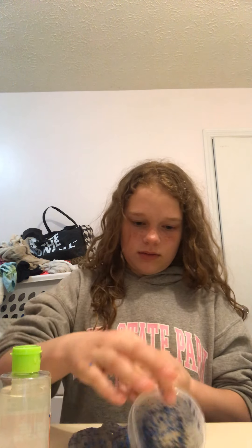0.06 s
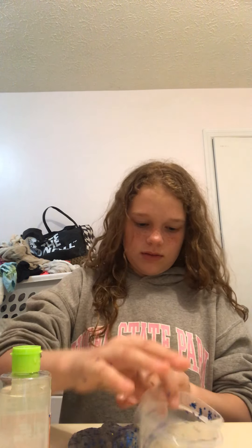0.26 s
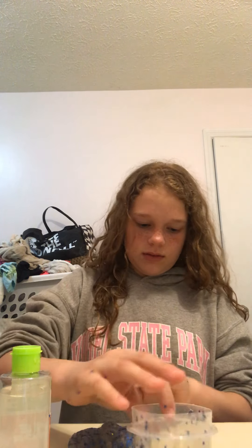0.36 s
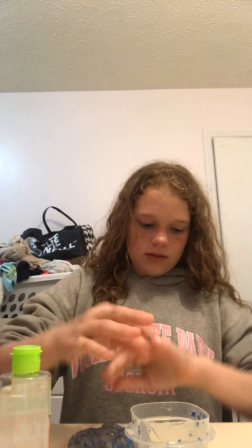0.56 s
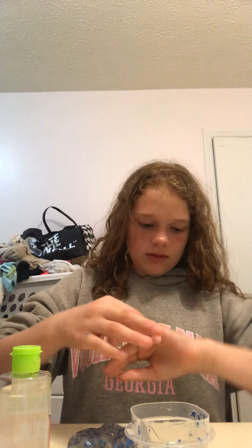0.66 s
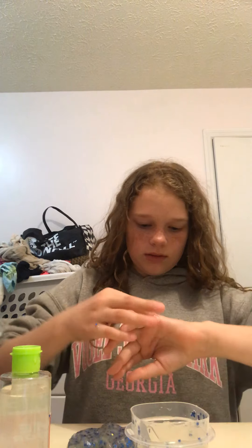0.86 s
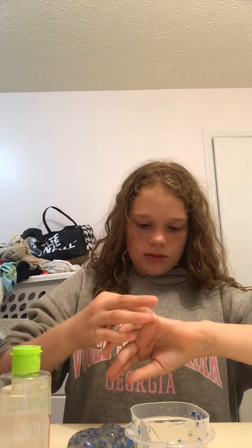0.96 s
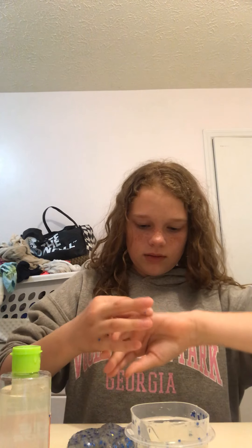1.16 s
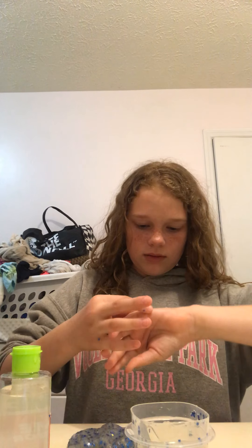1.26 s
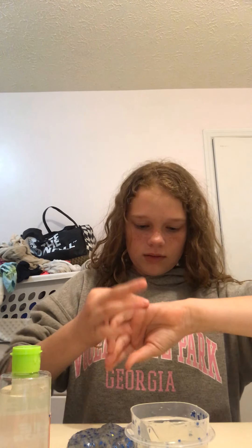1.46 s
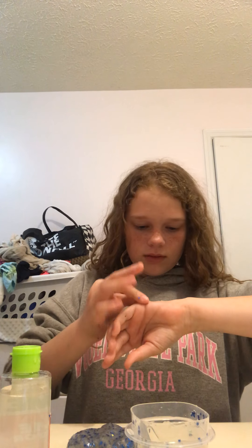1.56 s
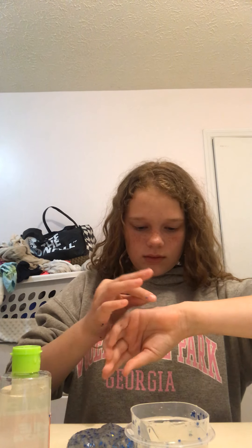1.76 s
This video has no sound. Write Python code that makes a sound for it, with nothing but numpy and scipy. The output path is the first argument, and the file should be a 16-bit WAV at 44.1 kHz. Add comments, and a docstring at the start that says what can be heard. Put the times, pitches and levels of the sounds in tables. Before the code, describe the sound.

An empty plastic tub tips over on a table, starting with a light tap and a soft rub. At about 0.2 seconds it lands with a sharp, hollow knock and skids briefly. A second knock follows near 0.4 seconds as it drops flat, and it rocks to rest by about 0.6 seconds. The small room rings shortly, then only a faint, low ventilation rumble remains.

```python
"""An empty plastic tub tips over onto a table in a small, quiet room.
It rubs as it turns, lands with a hollow knock, skids briefly, then drops flat with a second knock
and rocks to rest. Each contact rings its walls, base and rim and thuds the table; the rub and skid
are dense tiny catches of slipping plastic. The room rings shortly over a low ventilation rumble."""
import sys
import numpy as np
from scipy import signal
from scipy.fft import rfft, irfft
from scipy.io import wavfile
from scipy.ndimage import uniform_filter1d

SR = 44100
rng = np.random.default_rng(int(sys.argv[2]) if len(sys.argv) > 2 else 0)


def dump_mix(stems):
    """Bounce the given channels to the path in sys.argv[1] as a 16-bit WAV at rate SR."""
    frames = np.atleast_2d(stems).T  # one column per channel
    limited = np.clip(frames, -1, 1)  # hard clip at full scale
    pcm = np.round(limited * 32767).astype(np.int16)
    wavfile.write(sys.argv[1], SR, pcm)


N = 79380

# modes of the table under the tub: pitch_hz, level_db, t60_s
TABLE_MODES = [(59.66, -47.5, 0.38), (132.5, -29.5, 0.33), (167.2, -45.5, .5), (222, -44.5, .12),
               (362, -38, .1), (430, -37.5, .08)]
# modes of the tub's rim: pitch_hz, level_db, t60_s
RIM_MODES = [(2096, -29.5, 0.15), (2862, -46.5, 0.24)]


def from_db(db):
    """Decibels to gain."""
    return 10 ** (np.asarray(db) / 20)


def unit_rms(x):
    """Scale to unit rms."""
    return x / np.sqrt(np.mean(x ** 2) + 1e-20)


def at_hz(curve, hz):
    """Read a curve along log frequency."""
    freqs, values = np.transpose(curve)
    return np.interp(np.log(hz + 1e-9), np.log(freqs), values)


def passed(x, hz, kind):
    """Butterworth high-, low- or band-pass."""
    return signal.sosfilt(signal.butter(4, hz, kind, fs=SR, output="sos"), x)


def coloured(x, colour):
    """Minimum-phase EQ with the given curve and unit power gain."""
    gain = unit_rms(from_db(at_hz(colour, np.fft.rfftfreq(2 * N, 1 / SR))))
    cepstrum = irfft(np.log(gain))
    cepstrum[1:N] *= 2   # folded forward, so nothing sounds ahead of an attack
    cepstrum[N + 1:] = 0
    return irfft(rfft(x, 2 * N) * np.exp(rfft(cepstrum)))[:N]


def clicks(start_s, level_db):
    """One impulse per event."""
    out = np.zeros(N)
    np.add.at(out, np.clip(start_s * SR, 0, N - 1).astype(int), from_db(level_db))
    return out


def decay(t60_s):
    """Exponential decay from 1."""
    return np.exp(-np.log(1000) * np.arange(N) / SR / t60_s)


def ringing(force, hz, t60_s):
    """One mode: each impulse of force starts a dying sine."""
    radius, angle = from_db(-60 / (t60_s * SR)), 2 * np.pi * hz / SR
    return signal.lfilter([0, np.sin(angle)], [1, -2 * radius * np.cos(angle), radius ** 2], force + 1e-18)


def friction(pressure, colour):
    """Plastic slips in dense tiny catches whose size follows the pressure."""
    catches_per_s, spread_db = 2400, 2.5
    time_s, level_db = np.transpose(pressure)
    sizes = from_db(spread_db * np.minimum(rng.exponential(1, N), 4)) * rng.choice([-1, 1], N)
    catches = unit_rms(sizes * (rng.random(N) < catches_per_s / SR))
    envelope = from_db(np.interp(np.arange(N) / SR, time_s, level_db, left=-np.inf, right=-np.inf))
    return coloured(catches * envelope, colour)


def rub():
    """The tub rubs softly on the table as it turns."""
    # pressure of the rub: time_s, level_db
    pressure = [(0, -49.5), (.035, -52.5), (.054, -41), (.073, -38.5), (.086, -41.5), (.090, -77.5),
                (.11, -100)]
    # hollow tone of the rub: freq_hz, relative_db
    colour = [(100, -6), (300, -1), (480, 5.5), (590, 12.5), (720, -2), (900, 3), (1200, -2.5),
              (2000, -2.5), (2400, -5.5), (4000, -12.5), (5600, -9.5), (7800, -17.5), (10300, -21),
              (14500, -24.5)]
    return friction(pressure, colour)


def struck(modes, start_s, level_db):
    """Every blow sets each mode ringing, with slightly uneven strengths."""
    uneven_db = rng.standard_normal((len(start_s), len(modes)))
    return sum(ringing(clicks(start_s, level_db + mode_db + uneven_db[:, k]), hz, t60_s)
               for k, (hz, mode_db, t60_s) in enumerate(modes))


def rim_tick(start_s, level_db):
    """The hard rim's dense high modes blur into a short burst of noise at each blow."""
    # bright tone of the tick: freq_hz, relative_db
    colour = [(800, -8), (1800, -5.5), (2400, 6), (3700, -0.5), (4200, -3.5), (5200, 0.5), (7500, -7.5),
              (10300, -23.5), (11700, -22), (15500, -33)]
    envelope = signal.fftconvolve(clicks(start_s, level_db - 21.5), decay(t60_s=0.013))[:N]
    return coloured(envelope * rng.standard_normal(N), colour)


def knocks():
    """Each contact rings the tub, thuds the table and ticks on the rim."""
    # the tub meets the table: start_s, level_db, then offsets wall_db, thud_db, tick_db, rim_db
    contacts = [(.001, -31, -2.5, 5.5, -14, -10.5), (.009, -27.5, 3.5, 19, -21, -6),
                (.2118, -1.5, 3.5, -1.5, -2, -1.5), (0.2256, -6.5, -6.5, 8.5, 0.5, -2),
                (0.248, -25.5, 2, 14, -10, -1), (0.3282, -21, 9.5, -2, -13, 4),
                (.426, -21.5, 1, -1, -2.5, -13.5), (.431, -1.85, -6, -7.5, 0.5, -12.5),
                (.457, -21, -6.5, 7.5, -13, -16), (0.475, -16, 5, 5, -5.5, -9),
                (0.4996, -17.5, 5.5, 5.5, -22, -9), (0.511, -19.5, 1.5, 7, -20, -11)]
    # modes of the tub's base: pitch_hz, level_db, t60_s
    base_modes = [(855, -24.5, 0.0763), (1070, -27, 0.026), (1136, -28, 0.039), (1212, -8.5, 0.025),
                  (1218, -29, 0.18), (1289.5, -15.5, 0.0446), (1450, -28, 0.066), (1647, -26, 0.063)]
    # low modes of its walls: pitch_hz, level_db, t60_s
    wall_modes = [(335, -27.5, 0.02), (399, -23, 0.054), (500, -17, 0.018), (578, -22, .05)]
    # notches where its faces cancel: pitch_hz, width_hz
    notches = [(715, 140), (1840, 192)]
    radiates_above_hz, contact_soft_hz = 240, 1600
    start_s, level_db, wall_db, thud_db, tick_db, rim_db = np.transpose(contacts)
    shell = struck(base_modes, start_s, level_db) + struck(wall_modes, start_s, level_db + wall_db)
    for hz, width_hz in notches:
        shell = signal.lfilter(*signal.iirnotch(hz, hz / width_hz, fs=SR), shell)
    thud = struck(TABLE_MODES, start_s, level_db + thud_db)
    body = passed(shell, radiates_above_hz, "high") + thud
    tick = rim_tick(start_s, level_db + tick_db)
    rim = struck(RIM_MODES, start_s, level_db + rim_db)
    return passed(body, contact_soft_hz, "low") + rim + tick


def driven(modes, force):
    """The modes answer a continuous force."""
    return sum(from_db(level_db) * ringing(force, hz, t60_s) for hz, level_db, t60_s in modes)


def skid():
    """The landed tub scrapes along the table, and the rim and the table ring with it."""
    # pressure of the skid: time_s, level_db
    pressure = [(.222, -60), (.242, -37.5), (.268, -42), (.284, -35), (.297, -38), (.306, -47), (.328, -44),
                (.342, -80.5)]
    # tone of the scrape: freq_hz, relative_db
    colour = [(100, 4), (380, 13.5), (700, -4), (850, 6.5), (980, -3), (1250, -0.5), (1750, -3.5),
              (2900, 0.5), (3900, -3.5), (4400, -4), (5400, -1), (7200, -10.5), (10300, -22.5),
              (12000, -21.5), (14500, -25)]
    scrape = friction(pressure, colour)
    return scrape + from_db(-14) * driven(RIM_MODES, scrape) + from_db(-21) * driven(TABLE_MODES, scrape)


def diffuse_tail(t60_s):
    """Echoes build into dying noise of unit energy, evened so that no single pitch stands out."""
    build_s, even_hz = .008, 40
    build = 1 - np.exp(-(np.arange(N) / SR / build_s) ** 2)
    half_decay = decay(2 * t60_s)   # applied before and after the evening
    spectrum = rfft(build * half_decay * rng.standard_normal(N))
    power = uniform_filter1d(np.abs(spectrum) ** 2, size=int(even_hz * N / SR))
    return unit_rms(irfft(spectrum / np.sqrt(power), N) * half_decay) / np.sqrt(N)


def room(direct):
    """Direct sound, dull close reflections and a short tail that lasts longest in the upper mids."""
    # bounces off nearby surfaces: delay_s, level_db
    reflections = [(.0024, -19), (.0062, -17), (.0098, -12)]
    # length of the tail: freq_hz, t60_s
    ring_times = [(120, 0.18), (400, 0.17), (1200, 0.29), (2000, 0.32), (3300, 0.34), (6000, 0.15),
                  (14000, 0.17)]
    # tone of the tail: freq_hz, relative_db
    colour = [(100, -9), (350, -2.5), (700, -3), (1200, -5.5), (2500, -4), (6000, -7.5), (14000, -0.5)]
    dull_hz, tail_db = 3700, -3
    response = passed(clicks(*np.transpose(reflections)), dull_hz, "low")
    edges_hz = np.geomspace(55, 17000, 13)
    for low, high in zip(edges_hz, edges_hz[1:]):
        centre_hz = np.sqrt(low * high)
        tail = passed(diffuse_tail(at_hz(ring_times, centre_hz)), [low, high], "band")
        response += tail * from_db(tail_db + at_hz(colour, centre_hz))
    return direct + signal.fftconvolve(direct, response)[:N]


def ventilation():
    """A bed of low rumble and faint hiss with a few wavering hum lines."""
    # tone of the rumble and hiss: freq_hz, relative_db
    colour = [(25, -21), (50, -2), (90, -2.5), (125, -2), (215, -11), (330, -14.5), (560, -14.5),
              (820, -21.5), (1100, -27), (2500, -32.5), (6700, -34.5), (10400, -40.5), (14000, -37)]
    # ventilation hum: pitch_hz, rms_db
    hum_lines = [(119, -61.5), (161.5, -68.5), (306.8, -69.5), (360.7, -68.5), (489.9, -73.5)]
    rumble_db, waver_depth = -56.5, .4
    t = np.arange(N) / SR
    bed = from_db(rumble_db) * unit_rms(coloured(rng.standard_normal(N), colour))
    for hz, rms_db in hum_lines:
        # slow drift of level and phase
        waver = signal.resample(rng.standard_normal(24) + 1j * rng.standard_normal(24), N)
        tone = np.exp(2j * np.pi * (hz * t + rng.random()))
        bed += from_db(rms_db) * unit_rms(np.real((1 + waver_depth * waver) * tone))
    return bed


def scene():
    """The tub, with its deepest bass cut, sounds in the room over the ventilation; mono."""
    tub = passed(knocks() + rub() + skid(), hz=42, kind="high")
    return (room(tub) + ventilation())[None]


def record(dry):
    """A steep low-pass cuts the top above 15.8 kHz."""
    return signal.sosfilt(signal.ellip(10, .1, 80, 15800, fs=SR, output="sos"), dry)


dry = scene()
out = record(dry)
dump_mix(out)
```